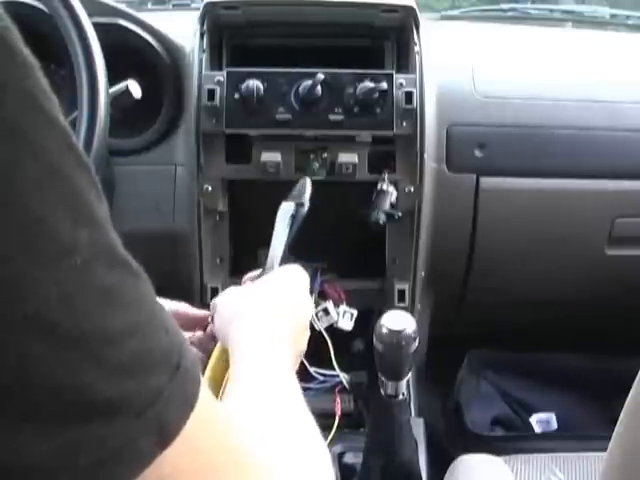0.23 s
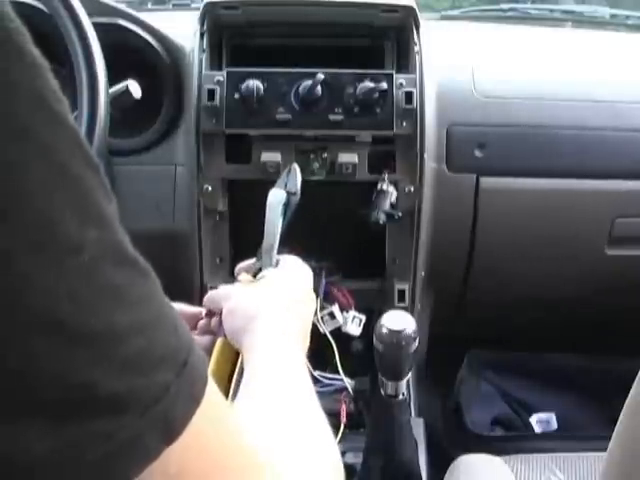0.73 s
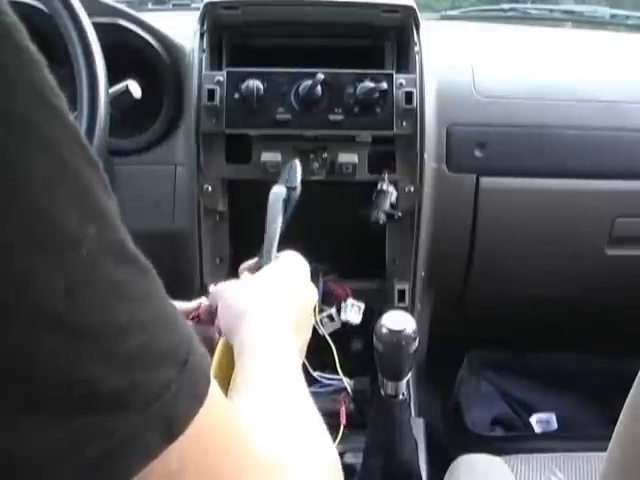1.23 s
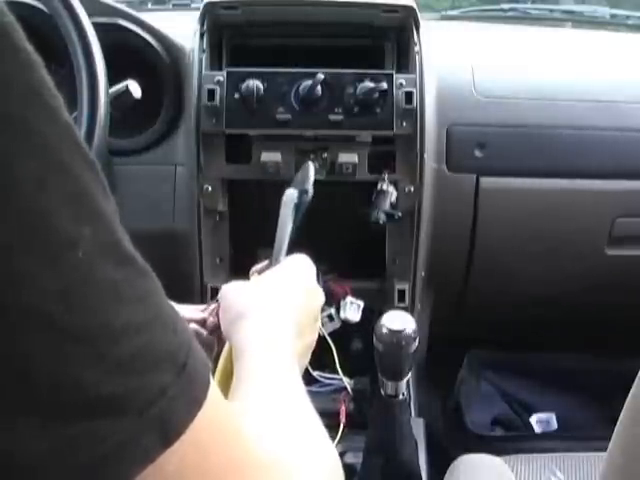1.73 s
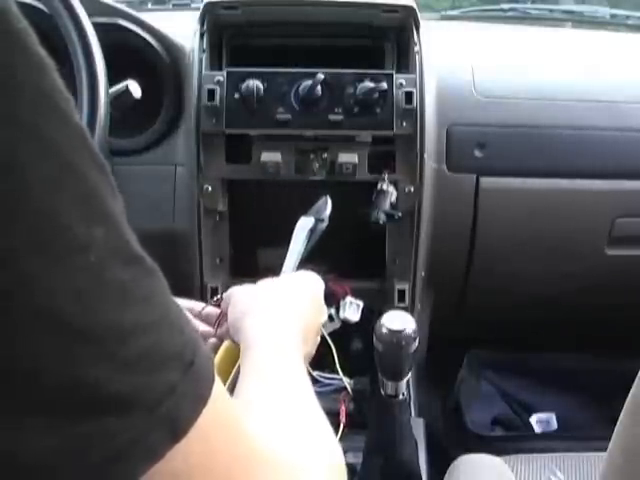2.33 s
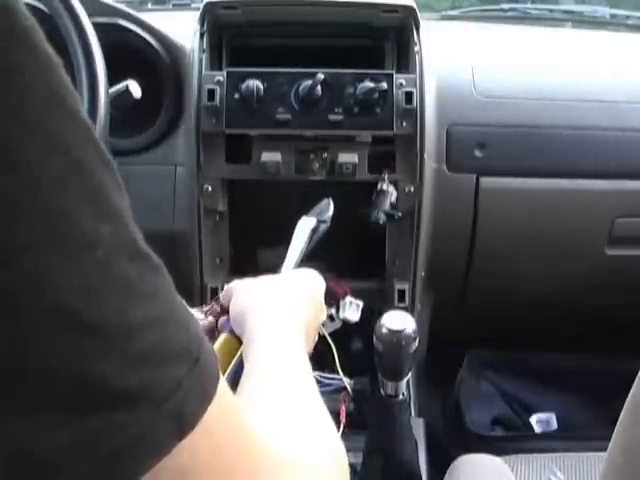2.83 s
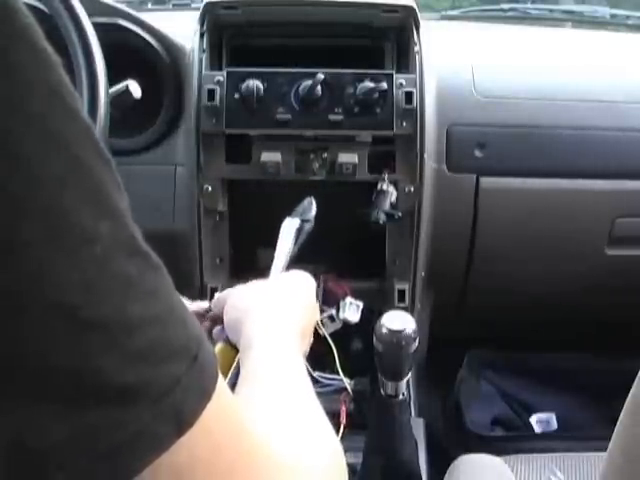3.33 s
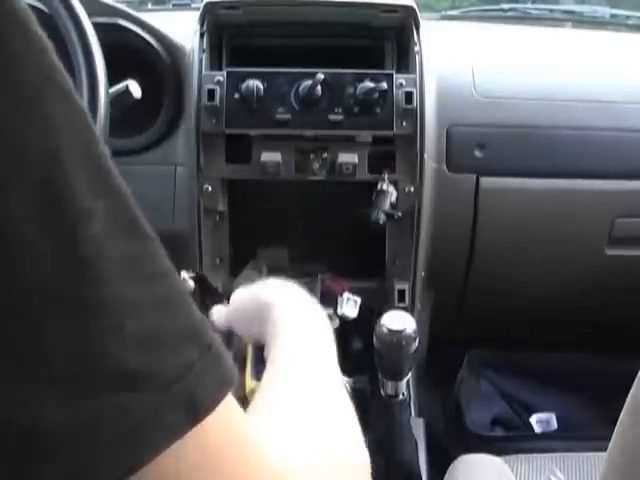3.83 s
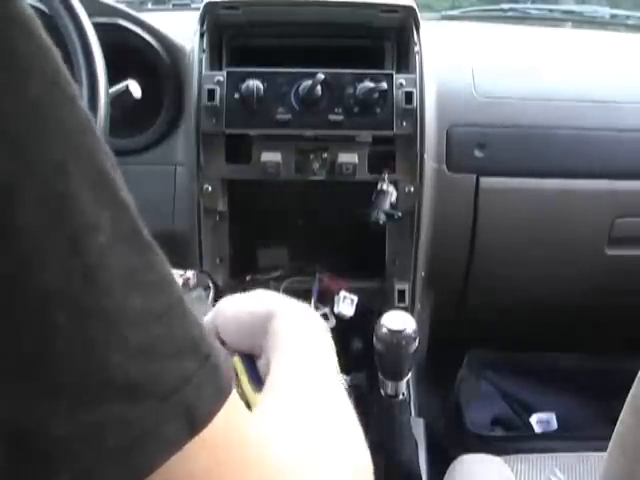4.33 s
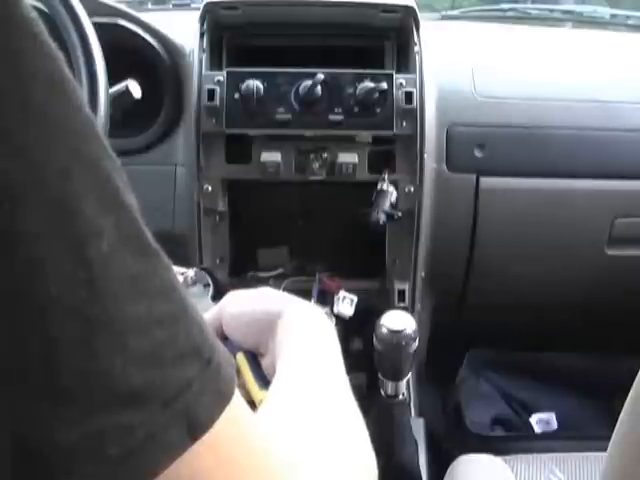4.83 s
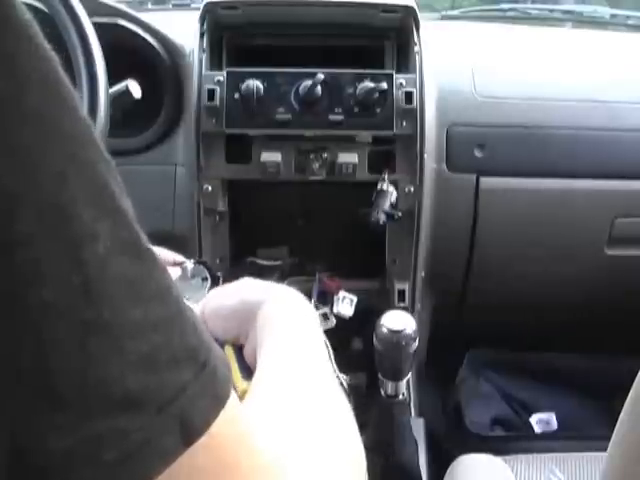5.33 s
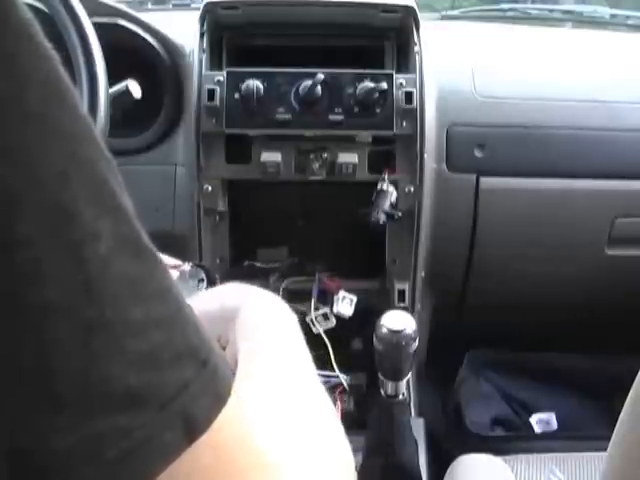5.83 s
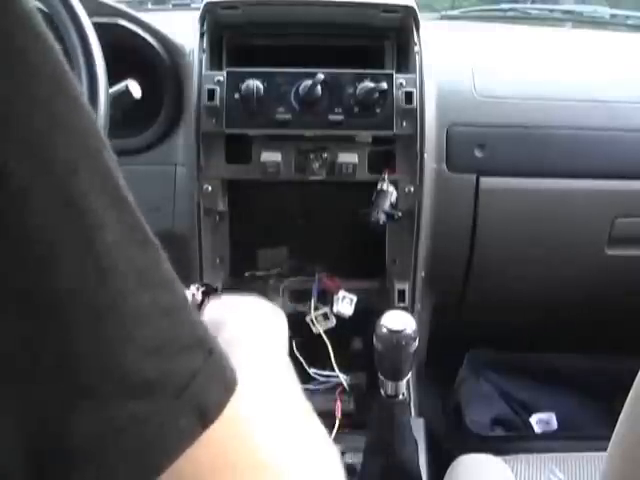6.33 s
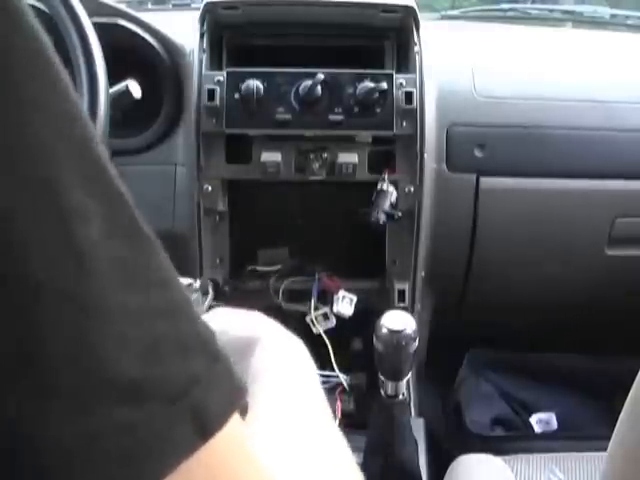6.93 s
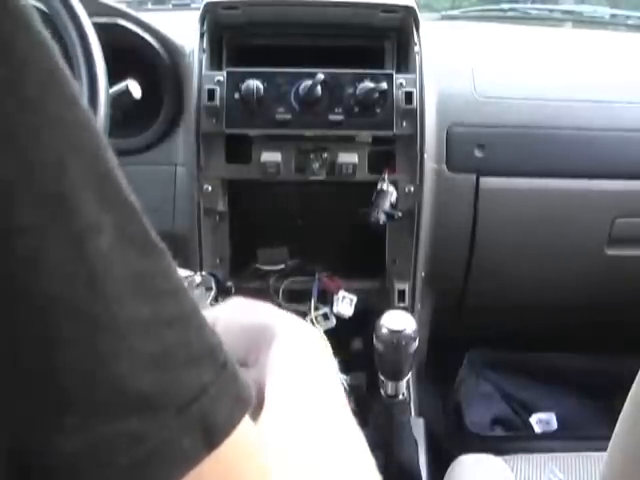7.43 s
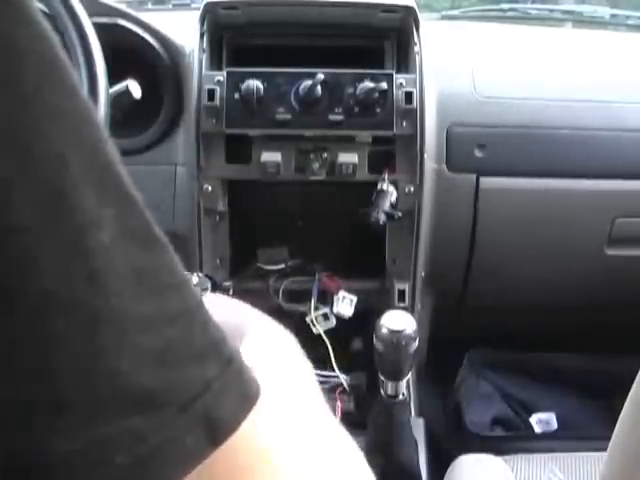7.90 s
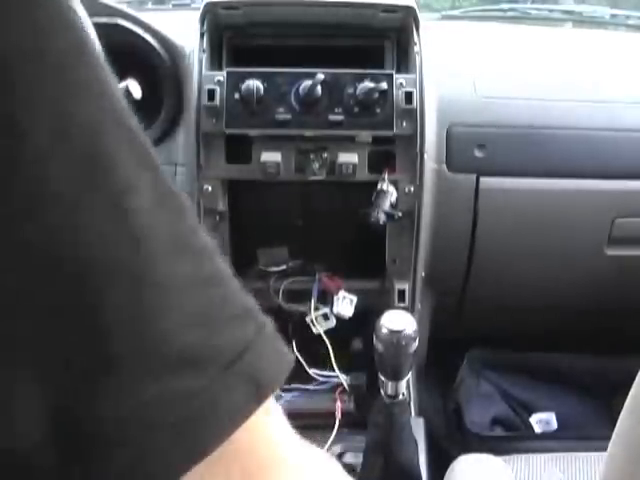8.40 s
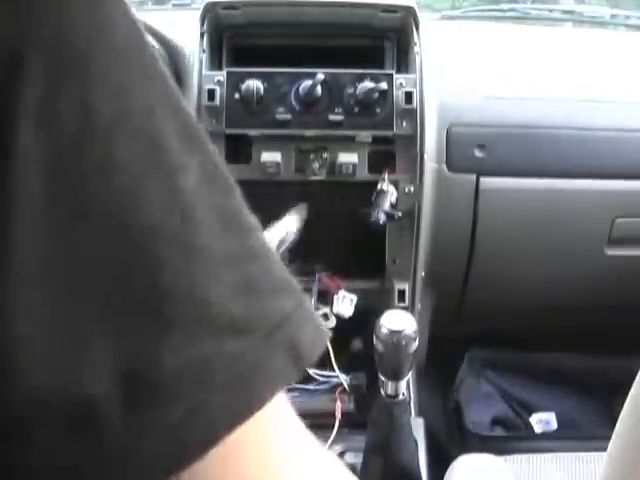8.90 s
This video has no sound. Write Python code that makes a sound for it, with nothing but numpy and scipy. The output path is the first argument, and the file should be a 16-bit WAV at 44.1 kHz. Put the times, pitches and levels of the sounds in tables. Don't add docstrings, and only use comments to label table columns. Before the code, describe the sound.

Close, dry handling in a parked car cab: light plastic taps and wire ticks, a bright steel clink, then a loud tool knock. After a quiet pause, cutters snap a plastic tie; a cluster of rustles and clacks follows, then a much louder second snap. Low outdoor hum, hiss and a faint camcorder whine run beneath.

```python
import sys
import numpy as np
from scipy import signal
from scipy.fft import rfft, irfft, next_fast_len
from scipy.io import wavfile
from scipy.ndimage import uniform_filter1d

SR = 44100
rng = np.random.default_rng(int(sys.argv[2]) if len(sys.argv) > 2 else 0)


def int16_out(signal):
    q = np.round(np.clip(np.atleast_2d(signal).T, -1, 1) * 32767)
    wavfile.write(sys.argv[1], SR, q.astype(np.int16))


def nominal_scale(level):
    x = np.asarray(level, float) / 20
    return 10 ** x


N = 403956
DRUM_HZ = 149.85
GLASS_ECHO_S, GLASS_ECHO_SHARE = 0.0038, 0.71

# t/s, peak level/dB, hardness/dB
JAW_CLACKS = [
    (3.69, -34, 1),
    (3.7018, -33, -2),
    (6.5079, -30.5, -2),
    (6.5595, -34.5, 5),
]


def log_gain(points, size):
    hz, db = np.transpose(points)
    bin_hz = np.arange(size // 2 + 1) * SR / size
    return np.interp(np.log(bin_hz + 1), np.log(hz), db) * np.log(10) / 20


def colour(x, points, causal=False):
    size = x.shape[-1]
    gain = log_gain(points, size)
    if causal:
        fold = np.r_[1, np.full(size // 2 - 1, 2), 1, np.zeros(size // 2 - 1)]
        gain = rfft(irfft(gain, size) * fold)
    return irfft(rfft(x) * np.exp(gain), size)


def unit(x):
    return x / np.sqrt(np.mean(x ** 2))


def fade(t, t60_s):
    return np.exp(-np.log(1000) * t / max(t60_s, 0.005))


def left_right(mid, side):
    return np.array([mid + side, mid - side])


def add(out, start_s, sound):
    i = max(int(start_s * SR), 0)
    out[:, i:i + sound.shape[1]] += sound[:, :N - i]


def walk(rate_hz):
    hold = int(SR / rate_hz)
    steps = np.repeat(rng.standard_normal(N // hold + 1), hold)
    return 1.32 * uniform_filter1d(uniform_filter1d(steps, hold), hold)[:N]


def air():
    # t/s, rumble level/dB, far traffic level/dB
    outside = [(0.0, -67, -66.5), (0.81, -66, -69.5), (1.12, -53.5, -71), (1.45, -71, -73.5),
               (1.94, -57, -75), (2.55, -58.5, -66), (2.85, -71, -71), (3.6, -58.5, -71),
               (4.16, -63.5, -72.5), (5.76, -60.5, -73), (6.3, -60.5, -68), (6.53, -51, -63.5),
               (6.75, -59.5, -70.5), (7.5, -60, -65.5), (7.85, -74, -66.5), (8.6, -50.5, -67.5),
               (8.85, -56, -71.5), (9.16, -59, -69)]
    # f/Hz, level/dB per Hz
    air_mid = [(15, -23), (25, -23), (59, 0.5), (157, -10), (180, -18), (242, -13), (301, -13.5),
               (427, -13.5), (607, -20), (754, -16.5), (1160, -22.5), (2280, -27.5), (9320, -29.5),
               (14800, -39.5), (16000, -62)]
    air_side = [(15, -47.5), (25, -3), (102, -12), (256, -8.5), (301, -9.5), (427, -11.5), (591, -7.5),
                (1160, -17.5), (1560, -16.5), (3430, -23.5), (11300, -30.5), (14800, -33), (16000, -51)]
    # f/Hz, width/Hz, left level/dB, right level/dB
    hollows = [
        (425.5, 14, -84, -62),
        (492, 63, -100, -67),
        (118.5, 11, -75, -73),
        (5540, 360, -74.5, -72.5),
        (2295, 590, -81.5, -70),
    ]
    rumble_points = [(25, -29), (50, 8), (59, 12.5), (85, -4.0), (130, -31.0)]
    traffic_points = [(600, -41.0), (1000, -2.0), (1400, 1.5), (1700, -2), (2200, -23.5)]

    t = np.arange(N) / SR
    s, rumble_db, traffic_db = np.transpose(outside)
    noise = rng.standard_normal((3, N))
    mid = nominal_scale(-60 + 0.27 * walk(3.21)) * unit(colour(noise[0], air_mid))
    side = nominal_scale(-63 + 0.55 * walk(2.85)) * unit(colour(noise[1], air_side))
    mid = mid + nominal_scale(np.interp(t, s, rumble_db) - 2.0) * unit(colour(noise[2], rumble_points))
    traffic = unit(colour(rng.standard_normal((2, N)), traffic_points))
    out = left_right(mid, side) + nominal_scale(np.interp(t, s, traffic_db) + 1.0) * traffic
    for hz, width_hz, left_db, right_db in hollows:
        peak = signal.iirpeak(hz, hz / width_hz, SR)
        tone = unit(signal.lfilter(*peak, rng.standard_normal(N)))
        out += nominal_scale(np.array([[left_db], [right_db]]) + 1.5 * walk(4)) * tone
    return out


def drum():
    # turn multiple, mid level/dB, side level/dB
    drum_tones = [
        (1, -70, -81),
        (9, -84, -90),
        (13, -87, -90),
        (15, -78, -82),
        (17, -86, -102),
        (30, -89, -108),
    ]
    head_mid_db = [-83, -95, -83, -94, -83, -87.5, -81, -86, -86, -100, -86, -85, -87, -87, -87, -85, -93,
                   -100, -99, -103, -105, -101, -103, -108]
    head_side_db = [-110, -101, -99, -110, -102, -99, -116, -105, -82, -99, -95, -99, -102, -79, -97, -99,
                    -86, -100, -92, -96, -90, -110, -99, -92]

    heads = [(2 * (25 + k), m, s) for k, (m, s) in enumerate(zip(head_mid_db, head_side_db))]
    tones = drum_tones + heads
    phases = 0.45 * rng.standard_normal((len(tones), 2, 1))
    t = np.arange(N) / SR
    mid_side = np.zeros((2, N))
    for (multiple, *db), phase in zip(tones, phases):
        level = np.sqrt(2) * nominal_scale(np.array(db))[:, None]
        mid_side += level * np.sin(2 * np.pi * multiple * DRUM_HZ * t + phase)
    return left_right(*mid_side)


def knock(db, points, t60_s, rise_s=0.00049, tail_db=-26, side_db=-14, crack=4.3, quick=0.59, glass=0):
    t = np.arange(8192) / SR
    noise = rng.standard_normal((3, 8192))
    clumps = nominal_scale(2.2 * unit(uniform_filter1d(noise[2], size=40)))
    echo = glass * (t > GLASS_ECHO_S) * fade(np.abs(t - GLASS_ECHO_S), 0.012)
    early = noise[:2] * clumps * (fade(t, t60_s) + quick * (fade(t, 0.014) + echo))
    dull = colour(noise[:2], [(1500, 3), (8000, -4), (14000, -12)])
    late = nominal_scale(tail_db) * dull * fade(t, 0.22)
    push = (early + late) * (1 - np.exp(-t / rise_s))
    push[0, 0] = crack
    mid, side = colour(push, points, causal=True)
    side = colour(side, [(300, 4.5), (3000, -10), (6000, -7.0), (13000, 7.0)], causal=True)
    return left_right(mid, nominal_scale(side_db) * side) * nominal_scale(db) / np.std(mid[:256])


def blow(db, hardness_db, low_db, body_db, top_db, t60_s):
    low_db = low_db - 0.17 * hardness_db
    top_db = top_db + hardness_db
    points = [(100, low_db - 11), (260, low_db + 15.5), (700, low_db + 10.5),
              (1400, (low_db + body_db) / 2 + 10.5), (2500, body_db + 9.0), (5700, 0.0092),
              (11000, top_db + 4.5), (16000, top_db - 14)]
    return knock(db - 11, points, t60_s, rise_s=0.00034, crack=9.4, quick=3.0, tail_db=-29)


def strike(out, hits, **struck):
    for s, db, hardness_db in hits:
        add(out, s + 0.0009, blow(db, hardness_db, **struck))


def tool_clicks(out):
    # t/s, peak level/dB, hardness/dB
    clicks = [
        (0.1456, -47, 2),
        (0.3626, -47.5, 0),
        (0.924, -32.5, -4),
        (6.4995, -46, 6),
        (1.9449, -25.5, -6),
        (5.1594, -50, -1),
        (7.649, -48, 3),
        (8.4407, -43.5, 9),
        (9.0533, -48, 2),
    ]
    strike(out, clicks, low_db=-14.5, body_db=-12, top_db=-12.5, t60_s=0.08)


def rustle(length_s, db, hz, octaves):
    slips = rng.standard_normal((2, 16384)) * nominal_scale(2.2 * rng.exponential(size=16384))
    low_hz, high_hz = hz * 2 ** -octaves, hz * 2 ** octaves
    band = [(low_hz / 2, -40), (low_hz, -12), (hz, 0), (high_hz, -12), (high_hz * 2, -40)]
    size = int(length_s * SR)
    mid, side = unit(colour(slips, band))[:, :size] * [[1], [0.35]]
    return left_right(mid, side) * np.hanning(size) * nominal_scale(db)


def rubs(out):
    # t/s, length/s, level/dB, centre f/Hz
    sleeve = [
        (0.348, 0.039, -53, 334),
        (1.157, 0.11, -58, 254),
        (1.934, 0.042, -63, 300),
        (3.685, 0.053, -57, 310),
        (6.495, 0.045, -44.5, 316),
        (6.555, 0.068, -53, 293),
        (6.572, 0.042, -54, 536),
        (8.667, 0.073, -57, 132),
        (8.757, 0.036, -55.5, 330),
    ]
    trim = [
        (6.525, 0.067, -55, 1320),
        (6.568, .03, -46, 1180),
        (8.7, 0.014, -54, 940),
        (9.122, 0.062, -55, 1160),
    ]
    wire = [
        (1.135, .03, -64, 8000),
        (1.2, 0.018, -56, 8333),
        (3.611, 0.036, -60, 7000),
        (3.79, 0.044, -61, 8000),
        (6.166, 0.052, -60, 9700),
        (6.364, 0.051, -59, 9000),
        (6.494, 0.013, -57, 7000),
        (6.546, 0.024, -51, 8000),
        (8.263, .03, -59, 6500),
    ]
    loom = [
        (1.176, 0.035, -52.5, 5500),
        (3.881, 0.062, -53.5, 6900),
        (6.213, 0.095, -58, 9259),
        (6.489, 0.14, -54.5, 4000),
        (7.727, 0.19, -64.5, 7000),
        (8.483, 0.11, -58.5, 5556),
        (9.073, 0.12, -59, 6000),
    ]
    squeaks = [
        (4.797, 0.064, -66.5, 2900),
        (7.104, 0.078, -62.5, 1238),
    ]
    surfaces = ((sleeve, 0.58), (trim, 0.5), (wire, 1.9), (loom, 4.7), (squeaks, 0.056))
    for slides, octaves in surfaces:
        for s, *slide in slides:
            add(out, s, rustle(*slide, octaves))


def plug_taps(out):
    # t/s, peak level/dB, hardness/dB
    taps = [(0.602, -49, 1), (0.6948, -42.5, 0), (0.767, -41, 4), (1.0296, -46, 2), (1.1293, -45, 6),
            (2.0489, -29, -13), (4.2193, -52, -4), (4.4378, -49.5, -1), (4.6364, -52, -1), (4.759, -51, -3),
            (6.4476, -45.5, 0), (7.882, -45, 0), (8.4951, -44.5, 5)]
    strike(out, taps, low_db=-12.5, body_db=-3, top_db=-10.5, t60_s=0.12)


def ring(db, modes, rise_s, unlike=0.093):
    t = np.arange(8192) / SR
    hz, mode_db, t60_s = np.transpose(modes)[:, :, None]
    turn = 2 * np.pi * rng.random((len(hz), 2))
    swing = nominal_scale(db + mode_db) * (1 - np.exp(-t / rise_s)) * np.exp(-np.log(1000) * t / t60_s)
    capsules = []
    for lead in (0, unlike):
        phase = turn[:, :1] + lead * turn[:, 1:]
        capsules.append(np.sum(swing * np.sin(2 * np.pi * hz * t + phase), axis=0))
    return np.array(capsules)


def pips(out):
    # t/s, level/dB, f/Hz, t60/s
    notes_struck = [(.6965, -54, 2900, 0.04), (.9252, -41, 2250, 0.024), (0.9248, -48, 1055, 0.055),
                    (.9252, -48, 3360, 0.026), (1.1895, -53, 5400, .04), (1.2045, -56, 10400, .03),
                    (1.9715, -46, 2150, 0.035), (2.1600, -60, 1850, .05), (2.1200, -58, 1900, .04),
                    (4.2200, -61, 3200, 0.036), (4.4385, -57, 3350, .05), (4.4385, -60, 5000, .04),
                    (5.1600, -59, 4500, .04), (6.488, -40, 1240, 0.014), (6.5605, -42, 8800, .02),
                    (6.5740, -46, 1150, .02), (7.6490, -57, 5700, 0.035), (7.8830, -55, 3400, 0.031),
                    (8.5380, -58, 9500, .04)]
    for s, db, hz, t60_s in notes_struck:
        add(out, s, ring(db, [(hz, 0, t60_s), (hz * 1.09, -5, t60_s)], 0.00074))


def wire_ticks(out):
    # t/s, peak level/dB, hardness/dB
    ticks = [
        (1.0999, -36, -2),
        (1.2454, -49, 3),
        (1.4651, -51, -4),
        (2.0926, -43.5, 15),
        (3.1802, -44, 4),
        (5.0085, -50, 0),
        (6.0834, -47, 2),
        (8.3554, -57, 3),
        (8.4087, -45, -1),
        (8.8563, -45.5, 9),
    ]
    strike(out, ticks, low_db=-14, body_db=-18, top_db=-4, t60_s=0)


def steel_clink(out):
    # t/s, level/dB
    clinks = [
        (1.6555, -20.5),
    ]
    # f/Hz, level/dB, t60/s
    steel_modes = [(5211, -18, 0.095), (6029, -7, 0.18), (7047, -6, 0.092), (7628, -11, 0.11),
                   (8177, -20, 0.22), (8409, 0, 0.16), (8872, -13, 0.1), (9060, -17, 0.19),
                   (9383, -1, 0.068), (10010, -11, 0.14), (10480, -4, 0.057), (11330, -16, 0.086),
                   (11550, -12, 0.1), (12750, -10, 0.11), (13210, -11, 0.065), (13600, -7, 0.14),
                   (14090, -14, 0.1), (14650, -30, 0.14)]
    partners = [
        (2050, -16, 0.12),
        (6095, -3.5, 0.16),
        (6100, -21, 0.09),
        (7040, -14, .1),
        (8200, 6, 0.055),
    ]
    # f/Hz, level/dB per Hz
    contact = [(300, -18.5), (2050, -24.5), (3500, -19), (4800, -15), (6000, -5), (8500, -8),
               (13000, -10.5), (16000, -32)]
    for s, db in clinks:
        bracket = ring(db - 9, steel_modes + partners, 0.0012)
        add(out, s, bracket + knock(db - 13.0, contact, 0.093, rise_s=0.0046, crack=0.1))


def bumps(out):
    # t/s, early rms level/dB, t60/s
    hits = [
        (1.8226, -39.5, 0.053),
        (6.5335, -46, .03),
        (6.5412, -48.5, .03),
        (6.5790, -43.5, 0.033),
        (6.5865, -51.5, 0.027),
    ]
    # f/Hz, level/dB per Hz
    colours = [
        [(200, -4), (600, 4.5), (1300, 1), (2300, 1), (3400, -9), (5000, 0.5), (9000, 3), (15000, -8),
         (15600, -60)],
        [(300, -5), (1400, 1), (3500, -8), (9000, -14), (15000, -24), (15600, -70)],
        [(300, 2), (700, 2), (2500, -8), (5000, -18), (15000, -34), (15600, -70)],
        [(300, -3), (1100, 0), (2000, -3), (3200, -15), (15000, -36), (15600, -70)],
        [(300, -4), (1200, 5), (2200, -6), (4000, -24), (15000, -28), (15600, -70)],
    ]
    for (s, db, t60_s), points in zip(hits, colours):
        sound = knock(db, points, t60_s, rise_s=0.00018, crack=3.0, quick=1.7, glass=GLASS_ECHO_SHARE)
        add(out, s, sound)


def chips(out):
    # t/s, peak level/dB
    contacts = [
        (6.4884, -38),
        (6.5005, -43),
        (6.5742, -35),
        (6.5882, -42),
        (1.9457, -33.5),
        (2.0497, -31.5),
    ]
    points = [(300, -3), (1500, 4), (6000, -2), (13000, -13), (15400, -50)]
    for s, db in contacts:
        add(out, s, knock(db - 14, points, 0.012, rise_s=0.0002, crack=5.0))


def small_parts(out):
    # t/s, level/dB
    hits = [
        (1.9463, -41.5),
        (2.0492, -37),
        (2.1448, -49.5),
        (5.5900, -32),
        (8.6462, -13.5),
        (8.8555, -58.5),
    ]
    # f/Hz, level/dB, t60/s
    modes_of_each = [
        [(780, -8, 0.07), (1660, -5, 0.057), (2130, -3, .08), (2290, 3, 0.035), (2800, -6, .06),
         (3350, 0, 0.047), (4530, -2, 0.04), (5730, 2, 0.055)],
        [(1150, -7, .05), (1670, -2, 0.037), (1840, -0.5, 0.039), (2180, 2, 0.046), (3200, 3, 0.035),
         (4050, -5, 0.046)],
        [(1810, -1, .07), (2610, -7, 0.045)],
        [(240, -11, 0.073), (960, -10, 0.084), (1050, -12, 0.065), (2570, -9.5, 0.066), (3780, 0, 0.047),
         (4300, -9, .04), (6900, 0, 0.03), (7300, 4, .03), (7880, -2, .03), (8400, -2, .03), (9000, 0, .03),
         (9600, -2, .03), (10140, 7, .03)],
        [(220, -28, 0.054), (1030, -15, 0.055), (1954, -11, 0.022), (2210, -12, 0.043), (2676, -18, 0.081),
         (3050, -9, .03), (4340, -11, .035), (5030, -10, 0.041), (5260, -6, .043), (5440, -15, .045),
         (5565, -4, 0.04), (5700, -4, 0.034), (5700, 3, 0.013), (6700, -8, 0.034), (9440, -3, 0.036)],
        [(7000, 3, .08), (8600, -5, .05), (10050, 3, .12), (11800, -3, .08), (12300, -1, .1), (13200, 0, .1)],
    ]
    for (s, db), modes in zip(hits, modes_of_each):
        add(out, s, ring(db, modes, 0.0012))


def panel_knocks(out):
    # t/s, peak level/dB, hardness/dB
    knocks = [
        (1.9714, -41, 5),
        (2.144, -47, -11),
        (6.4873, -43, 0),
        (6.537, -38, -1),
        (6.573, -35, 10),
        (6.5864, -48, 12),
        (8.7684, -42.5, -20),
        (8.8759, -40.5, 2),
    ]
    strike(out, knocks, low_db=6, body_db=5.5, top_db=-7, t60_s=0.21)


def tyre_whine(length_s, db, hz, octaves):
    size = int(length_s * SR)
    band = [(hz * 2 ** (-3 * octaves), -30), (hz, 0), (hz * 2 ** (3 * octaves), -30)]
    hiss = unit(colour(rng.standard_normal((2, SR)), band))[:, :size]
    return hiss * np.sqrt(np.hanning(size)) * nominal_scale(db)


def jaw_clacks(out):
    strike(out, JAW_CLACKS, low_db=-12, body_db=-14, top_db=-12, t60_s=0.026)


def jaw_ring(out):
    # f/Hz, level/dB, t60/s
    jaw_modes = [
        (790, -8.5, 0.042),
        (2465, -4, 0.024),
        (3915, -3.5, .03),
        (4690, -12.5, 0.047),
        (6230, 3.5, 0.018),
        (9100, -12, 0.018),
    ]
    for s, db, _ in JAW_CLACKS:
        add(out, s + 0.00097, ring(db - 8.5, jaw_modes, 0.0003))


def snips(out):
    # t/s, early rms level/dB, t60/s
    cuts = [
        (5.5865, -30.5, 0.012),
        (5.5900, -26, 0.045),
        (8.6400, -31, 0.11),
        (8.646, -14, 0.031),
    ]
    # f/Hz, level/dB per Hz
    colours = [
        [(300, -24), (1000, -16.5), (2500, -14), (5500, 4), (8000, -14), (12000, -24), (16000, -42)],
        [(100, -26), (230, -4), (600, -25), (1020, -8), (1600, -26), (2600, -3), (3800, -2), (5500, -5),
         (8000, 8), (10500, 1), (14500, -1), (16500, -35)],
        [(300, -39.5), (1000, -11.5), (2200, -7), (3800, -10), (5500, -4), (9500, -10), (12000, -23),
         (16000, -42)],
        [(100, -18.5), (220, -12), (500, -25), (1020, -12), (1350, -26), (1650, -6.5), (3000, -8), (4400, -10),
         (5600, 1), (6600, -7), (9300, -7.5), (15000, -14), (16500, -44)],
    ]
    for (s, db, t60_s), points in zip(cuts, colours):
        sound = knock(db, points, t60_s, rise_s=0.0002, tail_db=-26.5, crack=1.7, glass=GLASS_ECHO_SHARE)
        add(out, s, sound)


def booms(out):
    # t/s, level/dB, f/Hz, rise/s, t60/s
    swings = [
        (5.6, -33, 61.7, 0.025, 0.23),
        (6.5, -33, 58, 0.037, 0.24),
        (6.57, -36.5, 69.3, 0.018, 0.26),
        (8.656, -29.5, 61, .03, 0.23),
    ]
    t = np.arange(SR // 2) / SR
    for s, db, hz, rise_s, t60_s in swings:
        envelope = (1 - np.exp(-(t / rise_s) ** 2)) * fade(t, t60_s)
        swing = nominal_scale(db) * envelope * np.sin(2 * np.pi * hz * t)
        add(out, s, np.tile(swing, (2, 1)))


def scene():
    out = air() + drum()
    for source in (tool_clicks, rubs, plug_taps, wire_ticks, steel_clink, panel_knocks, jaw_clacks):
        source(out)
    add(out, 2, tyre_whine(length_s=0.9, db=-68, hz=2500, octaves=0.5))
    out = colour(out, [(15150, -1.0), (15500, -51)])
    for source in (pips, bumps, chips, small_parts, jaw_ring, snips, booms):
        source(out)
    return out


def roll_off(x):
    return signal.sosfilt(signal.butter(12, 16810, fs=SR, output="sos"), x)


def record(dry):
    memory, depth, top_hz, limit = 0.65, 0.69, 6500, 0.85
    size = next_fast_len(N + SR)
    hz = np.arange(size // 2 + 1) * SR / size
    back = np.exp(-2j * np.pi * hz / (2 * DRUM_HZ))
    average = (1 - memory) * back / (1 - memory * back)
    repeat = average / (1 + (hz / top_hz) ** 8)
    notched = irfft(rfft(dry, size) * (1 - depth * repeat), size)[:, :N]
    limited = limit * np.tanh(notched / limit)
    mix = irfft(rfft(limited, size) * (hz < 16700), size)[:, :N]
    return roll_off(mix)


dry = scene()
out = record(dry)
int16_out(out)
```